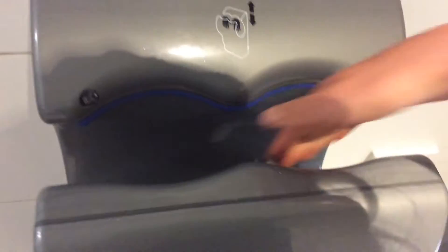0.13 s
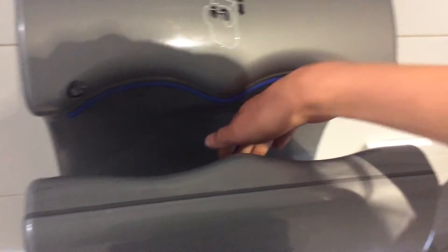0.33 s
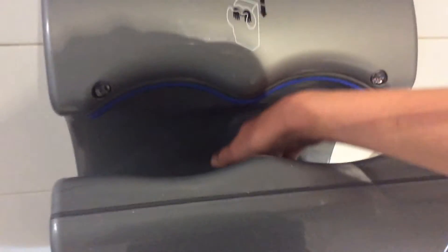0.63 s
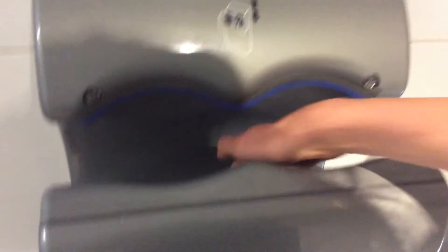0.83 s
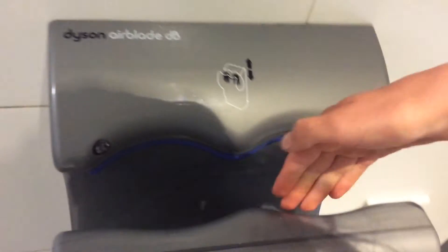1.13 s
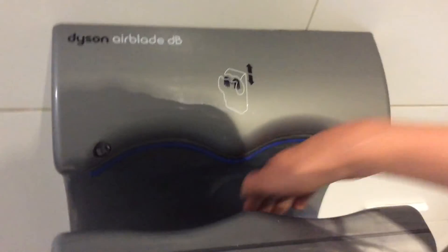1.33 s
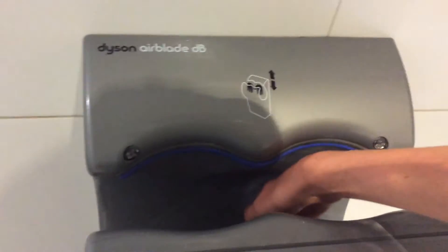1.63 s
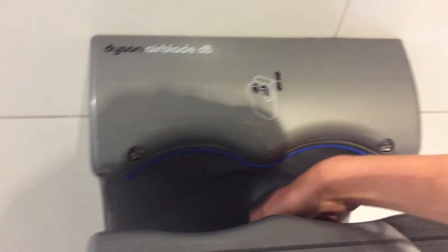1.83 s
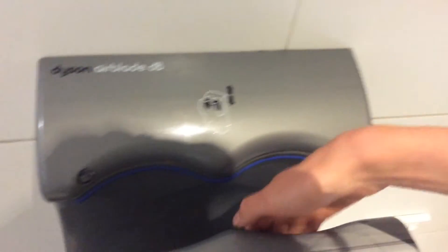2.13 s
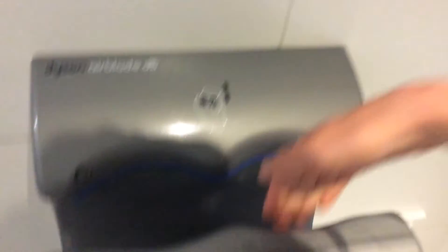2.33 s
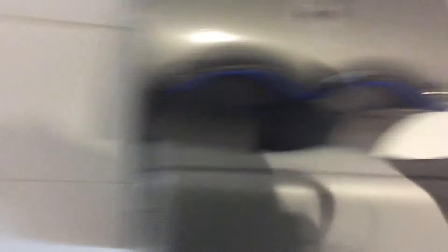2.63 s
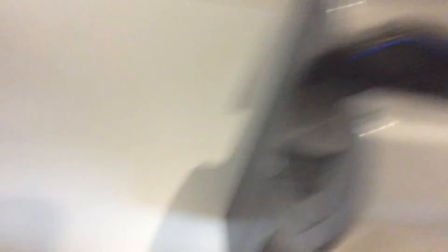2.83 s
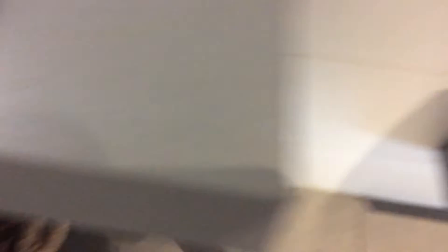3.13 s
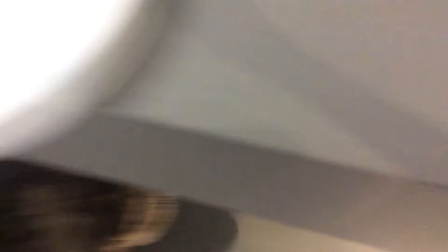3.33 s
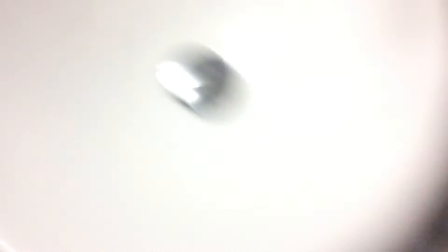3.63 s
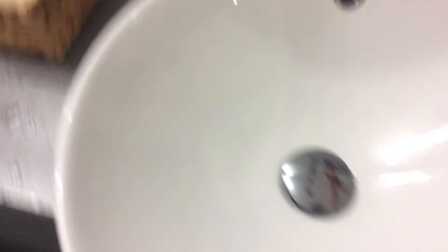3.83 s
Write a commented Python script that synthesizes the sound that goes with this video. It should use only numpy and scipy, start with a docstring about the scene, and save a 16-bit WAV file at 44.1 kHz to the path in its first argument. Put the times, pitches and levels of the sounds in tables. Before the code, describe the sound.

A hand dryer blows a loud, hissing rush with a high motor whine, whooshing as a hand dips in and out, close by in a tiled washroom. It winds down, then a faint knock and running tap follow.

```python
"""A wall hand dryer blows two thin sheets of air in a tiled washroom: their turbulence hisses, and breaks
on a hand that dips in and out. Hollow whooshes sound at the slot. The duct roars and the fast motor
whines at multiples of its shaft speed over a mains hum. Switched off, it coasts down under air drag:
its tones fall and the rush dies away. At the very end come a faint knock and the spray of a tap
starting to run in a basin."""
import sys
import numpy as np
from scipy import signal
from scipy.io import wavfile
from scipy.ndimage import uniform_filter1d

SR = 44100
rng = np.random.default_rng(int(sys.argv[2]) if len(sys.argv) > 2 else 0)


def dump(signal):
    """Clip the signal to [-1, 1] and save it as 16-bit WAV at the path in sys.argv[1]."""
    limited = np.clip(np.atleast_2d(signal).T, -1, 1)
    pcm = np.round(limited * 32767).astype(np.int16)
    wavfile.write(sys.argv[1], SR, pcm)


N = 176400
T = np.arange(N) / SR

SHAFT_HZ, MAINS_RIPPLE_HZ = 1545.4, 100
OFF_S, COAST_S = 3.165, 0.2  # the speed has halved COAST_S after switch-off
PATCHY_DB = 1.5  # depth of the drifting patches in the air noise

# Noise spectra, each with the columns: frequency_hz, relative_density_db
ROOM_SPECTRUM = [(30, -26), (150, -7), (240, -13), (345, -10.5), (600, -40), (700, 10), (1150, 16),
                 (1400, -34), (2560, -50), (3700, 14), (5000, 4), (7000, 4.5), (8370, -61), (10300, -58),
                 (10900, -60)]  # quiet air of the room
SPRAY_SPECTRUM = [(700, -39), (1020, -43), (1140, -24), (1300, -31), (2200, -28), (2450, -23), (3070, -21),
                  (3580, -18), (4000, -27), (4900, -15), (7000, -17), (8200, -9.5), (9800, -19),
                  (11000, -38), (14000, -53)]  # droplets on the basin
RUMBLE_SPECTRUM = [(15, -24), (30, -17), (60, -1.5), (85, 0), (130, -34)]  # deepest gusts of the airflow
LOW_ROAR_SPECTRUM = [(60, -35), (90, -1), (130, 1), (155, -3), (200, 1.5), (240, -4), (320, -20)]  # bass of the airflow
DUCT_SPECTRUM = [(170, -40), (250, -12.5), (295, -2), (365, -9), (410, -3.5), (465, -5.5), (512, -2.5),
                 (560, -10), (600, -10.5), (710, -11), (900, -13), (1200, -13), (1500, -24), (2000, -15)]  # air in the duct
HAND_SPECTRUM = [(650, -46), (1100, -9), (1480, -4.5), (1600, -3), (1870, -5), (2180, -3), (2470, -5),
                 (3250, -2.5), (3640, -4), (5000, -8), (6500, -4), (11000, -120)]  # air breaking on the hand
SHEET_SPECTRUM = [(2100, -64), (3500, -19), (4900, -13.5), (5600, -8.5), (6250, -2.5), (6700, -3.5),
                  (7300, -7), (7980, -3.5), (8080, 0.5), (8450, 0.5), (8800, -3), (9500, -5.5),
                  (10500, -15.5), (11500, -22), (12500, -47), (13300, -29), (13700, -39), (13900, -45),
                  (14150, -44)]  # the two air sheets

# Harmonics of the supply hum: ripple_multiple, base_level_db
HUM_HARMONICS = [(1, -34.5), (2, -45)]
# Tones of the driven motor: shaft_multiple, base_level_db, ripple_depth_rad
SHAFT_ORDERS = [(1, -48, 0.37), (2, -55.5, .3), (4, -42, 0.41), (9, -57, 1.2)]
# How strongly the casing radiates a coasting tone: pitch_hz, level_db
CASING_RESPONSE = [(300, -44), (345, -41), (400, -47), (450, -60), (510, -39), (550, -43), (600, -36),
                   (650, -49), (820, -53), (910, -37.5), (980, -46), (1100, -36.5), (1200, -43),
                   (1400, -58), (1750, -58), (1950, -41), (2200, -54), (2450, -41.5), (2650, -52),
                   (2850, -39.5), (3250, -38.5), (3600, -44), (4500, -64), (6200, -66)]
# Course of the roar at full fan speed: time_s, duct_level_db, low_roar_level_db
ROAR_LEVELS = [(0.0, -35, -48), (0.03, -36.5, -35), (0.2, -34, -40), (0.26, -32.5, -36), (0.99, -32.5, -37),
               (1.1, -38, -38.5), (1.82, -31.5, -37.5), (1.9, -35, -47), (1.95, -31, -37.5),
               (2.0, -33, -43), (2.05, -29.5, -34), (2.09, -30.5, -59), (2.17, -34.5, -36.5),
               (2.55, -37, -42), (2.66, -34.5, -33.5), (2.96, -34.5, -39.5), (2.98, -36, -33),
               (3.2, -32.5, -42)]
# Hollow whooshes at the slot; the last is a bright, sinking rush of air after the hand has left:
# start_s, length_s, first_pitch_hz, last_pitch_hz, level_db
SLOT_WHOOSHES = [(0.232, 0.22, 2330, 2070, -31), (0.274, 0.39, 1640, 1560, -37),
                 (0.688, 0.23, 1510, 1360, -36), (0.932, 0.13, 1480, 1670, -33),
                 (0.988, 0.076, 2230, 2130, -33), (1.37, 0.44, 1590, 1570, -40),
                 (1.72, 0.42, 1400, 1410, -36.5), (2.015, 0.41, 1720, 2180, -39),
                 (2.294, 0.057, 493, 486, -34), (2.806, 0.55, 3970, 3620, -42)]
# Course of the hiss at full fan speed: time_s, sheet_level_db, hand_level_db, treble_gain_db
JET_LEVELS = [(0.0, -16, -29.5, 2.5), (0.04, -15.5, -34, -0.5), (0.13, -20.5, -34.5, 2),
              (0.22, -17.5, -35.5, -0.5), (0.27, -14.5, -28, -2), (0.32, -17.5, -27, 0.5),
              (0.4, -15.5, -26, -2), (0.49, -15, -26, 2.5), (0.55, -15.5, -28.5, -0.5),
              (0.62, -16, -27, 0.5), (0.69, -18, -31, 2), (0.76, -20.5, -31, 3), (0.82, -15, -28.5, -1.5),
              (0.92, -14.5, -31.5, 3), (0.98, -13.5, -25.5, -2.5), (1.03, -14, -27, 2.5),
              (1.065, -11.5, -26, 1.5), (1.15, -13.5, -34.5, -2), (1.19, -18.5, -34, -0.5),
              (1.33, -18.5, -36, -0.5), (1.37, -15, -28, -1), (1.44, -18.5, -28, 1),
              (1.5, -15, -26.5, -0.5), (1.58, -15, -29.5, 1.5), (1.62, -16, -30, -1), (1.7, -17.5, -31, 1),
              (1.8, -17.5, -31, -0.5), (1.84, -17.5, -32, 0.5), (1.93, -18, -29, 1.5),
              (1.97, -16, -28.5, -1), (2.1, -15.5, -26, -0.5), (2.17, -13, -26, -1), (2.23, -11.5, -30, 0),
              (2.3, -12, -29.5, -2.5), (2.38, -13.5, -30.5, 0), (2.42, -19.5, -34.5, 2.5),
              (2.46, -18.5, -34.5, 0), (2.73, -18.5, -35, 1.5), (2.86, -21, -35, 4), (3.15, -22, -35.5, 1),
              (3.24, -24, -34.5, 7), (3.4, -21.5, -34, 0.5), (3.55, -19.5, -32, -1),
              (3.7, -21.5, -33.5, -3)]


def amp(db):
    """Amplitude ratio of a level in decibels."""
    return 10 ** (np.asarray(db) / 20)


def unit_rms(x):
    """Normalisation to unit mean power."""
    return x / np.sqrt(np.mean(x ** 2) + 1e-20)


def level_at(spectrum, hz):
    """Interpolation of a spectrum over log frequency; -90 dB beyond its ends."""
    points_hz, points_db = np.transpose(spectrum)
    return np.interp(np.log(hz + 1), np.log(points_hz + 1), points_db, left=-90, right=-90)


def envelopes(table):
    """Linear interpolation over time, one curve for each level column."""
    times_s, *columns = np.transpose(table)
    return [np.interp(T, times_s, column) for column in columns]


def drift(top_hz):
    """Superposed sines of random phase: a fluctuation in the three octaves below top_hz, rms 1."""
    return unit_rms(sum(np.sin(2 * np.pi * (hz * T + rng.random())) / np.sqrt(hz)
                        for hz in np.geomspace(top_hz / 8, top_hz, num=16)))


def shaped_noise(spectrum, patchy_db, size=1024):
    """Spectral shaping of Gaussian noise, with patches drifting in time and frequency; rms 1."""
    hz = np.fft.rfftfreq(size, 1 / SR)
    real, imag, patches = rng.standard_normal((N * 4 // size + 5, len(hz), 3)).T
    patches = unit_rms(uniform_filter1d(uniform_filter1d(patches, size=10, axis=0), size=10, axis=1))
    frames = (real + 1j * imag) * amp(level_at(spectrum, hz)[:, None] + patchy_db * patches)
    return unit_rms(signal.istft(frames, nperseg=size, noverlap=size * 3 // 4)[1][:N])


def lowpass(x, cutoff_hz, taps):
    """Linear-phase filtering without delay, so that bands can be split by subtraction."""
    return signal.oaconvolve(x, signal.firwin(taps, cutoff_hz, fs=SR), "same")


def resonate(x, hz, width_hz):
    """A damped resonator whose natural frequency follows the curve hz."""
    carrier = np.exp(2j * np.pi * np.cumsum(hz) / SR)
    pole = np.exp(-np.pi * width_hz / SR)
    return 2 * (carrier * signal.lfilter([1 - pole], [1, -pole], x / carrier)).real


def speed_halvings():
    """Quadratic air drag brakes the motor after switch-off; counts how often its speed has halved."""
    return np.log2(1 + np.maximum(T - OFF_S, 0) / COAST_S)


def room_air():
    """Ambient noise: the quiet air of the room sets a steady floor."""
    return amp(-55.5) * shaped_noise(ROOM_SPECTRUM, patchy_db=0.5)


def knock(start_s=3.9122, level_db=-35, pitch_hz=330, t60_s=0.03):
    """One heavily damped mode decays exponentially: a soft, dull knock."""
    age = np.maximum(T - start_s, 0)
    attack = np.minimum(age / 0.0013, 1)
    return -attack * amp(level_db - 60 * age / t60_s) * np.sin(2 * np.pi * pitch_hz * age)


def tap_water(start_s=3.937, rise_s=0.033, pipe_hz=1170, fall_hz_per_s=1170):
    """Fine droplet impacts on the basin merge into noise; the pipe adds a faint, sinking whistle."""
    age = T - start_s
    opening = np.sqrt(np.clip(age / rise_s, 0, 1))
    whistle = amp(-49) * np.sin(2 * np.pi * (pipe_hz * T - fall_hz_per_s * age ** 2 / 2))
    spray = amp(-32.5 + 0.6 * drift(300)) * shaped_noise(SPRAY_SPECTRUM, patchy_db=1, size=512)
    return opening * (spray + whistle)


def mains_hum(lift_db, stop_s=3.22, fade_s=0.029, ring_s=0.22, ring_share=0.16):
    """Harmonics of the supply ripple stop quickly, while a share rings on as room reverberation."""
    age = np.maximum(T - stop_s, 0)
    envelope = (1 - ring_share) * np.exp(-age / fade_s) + ring_share * np.exp(-age / ring_s)
    hum = np.zeros(N)
    for multiple, base_db in HUM_HARMONICS:
        level_db = base_db + lift_db * (multiple > 1) + 0.5 * drift(12)
        hum += amp(level_db) * np.sin(2 * np.pi * multiple * MAINS_RIPPLE_HZ * T)
    return envelope * hum


def shaft_whine(lift_db, jitter_rad=0.06, waver_db=1.8):
    """Wavering harmonics of the shaft rotation, phase-modulated by the mains ripple."""
    whine = np.zeros(N)
    for order, base_db, ripple_rad in SHAFT_ORDERS:
        wobble = ripple_rad * np.sin(2 * np.pi * MAINS_RIPPLE_HZ * T) + order * jitter_rad * drift(30)
        level_db = base_db + lift_db + waver_db * drift(13)
        whine += amp(level_db) * np.sin(2 * np.pi * order * SHAFT_HZ * T + wobble)
    return whine


def coasting_tones(jitter_rad=0.42, db_per_halving=8):
    """Forced vibration: two falling shaft orders swell as they sweep through the casing's resonances."""
    halvings = speed_halvings()
    speed_hz = SHAFT_HZ / 2 ** halvings
    turns = np.cumsum(speed_hz) / SR
    tones = np.zeros(N)
    for order in (1, 4):
        level_db = level_at(CASING_RESPONSE, order * speed_hz) - db_per_halving * halvings
        tones += amp(level_db) * np.sin(2 * np.pi * order * turns + jitter_rad * drift(90))
    return tones


def tile_reverb(x, t60_s=0.7, gain_db=-1):
    """Dense reflections from the tiles form an exponentially decaying tail."""
    tail = rng.standard_normal(SR // 2) * amp(-60 * T[:SR // 2] / t60_s)
    return amp(gain_db) * signal.fftconvolve(x, tail / np.linalg.norm(tail))[:N]


def motor(linger_s=0.05):
    """Tonal machine noise: after switch-off the whine lingers in the room and yields to coasting tones."""
    driven = np.clip((OFF_S - T) / linger_s + 1, 0, 1)
    lift_db = 4.5 * np.clip((T - 2.6) / 0.27, 0, 1)  # the tones come forward once the hand has left
    running = driven * shaft_whine(lift_db) + mains_hum(lift_db)
    coasting = (1 - driven) * coasting_tones()
    return np.sqrt(2) * (running + coasting + tile_reverb(coasting))  # sine levels from rms to peak


def duct_roar():
    """Turbulent duct flow roars over a gusting bass; each band drops a set level per halving of speed."""
    duct_db, low_db = envelopes(ROAR_LEVELS)
    halvings = speed_halvings()
    duct = amp(duct_db - 10.5 * halvings) * shaped_noise(DUCT_SPECTRUM, PATCHY_DB, size=2048)
    low_roar = amp(low_db - 8 * halvings) * shaped_noise(LOW_ROAR_SPECTRUM, PATCHY_DB, size=4096)
    gust_db = -43.5 + 2 * drift(9)
    rumble = amp(gust_db - 15 * halvings) * shaped_noise(RUMBLE_SPECTRUM, patchy_db=0, size=4096)
    return duct + low_roar + rumble


def slot_whooshes(width_hz=410):
    """Resonant filtering of noise: hollow whooshes at the slot swell and fade at a gliding pitch."""
    whooshes = np.zeros(N)
    for start_s, length_s, first_hz, last_hz, level_db in SLOT_WHOOSHES:
        progress = np.clip((T - start_s) / length_s, 0, 1)
        pitch_hz = first_hz + (last_hz - first_hz) * progress
        ring = resonate(resonate(rng.standard_normal(N), pitch_hz, width_hz), pitch_hz, width_hz)
        swell = np.sqrt(abs(np.sin(np.pi * progress)))
        whooshes += amp(level_db) * swell * unit_rms(ring)
    return whooshes


def air_sheets(fade_db_per_s=17):
    """Turbulent jet noise: the sheets hiss and break on the hand, weakening as the fan slows."""
    sheet_db, hand_db, treble_db = envelopes(JET_LEVELS)
    halvings = speed_halvings()
    # Both layers flicker together, and fade further as the air column comes to rest.
    flow_db = 0.5 * drift(40) - fade_db_per_s * np.maximum(T - OFF_S, 0)
    hiss = shaped_noise(SHEET_SPECTRUM, PATCHY_DB)
    body = lowpass(hiss, cutoff_hz=7400, taps=101)
    highest = hiss - lowpass(hiss, cutoff_hz=10600, taps=201)
    upper = hiss - body - highest
    treble = upper + amp(-26 * halvings) * highest  # the highest hiss dies fastest
    sheets = amp(sheet_db - 6.5 * halvings + flow_db) * (body + amp(treble_db) * treble)
    on_hand = amp(hand_db - 5.5 * halvings + flow_db) * shaped_noise(HAND_SPECTRUM, PATCHY_DB)
    return sheets + on_hand


def scene():
    """Superposition: all sources add at one point, the same in both channels."""
    dryer = air_sheets() + duct_roar() + slot_whooshes() + motor()
    mono = dryer + knock() + tap_water() + room_air()
    return np.array([mono, mono])


def record(dry, knee=0.7, headroom=0.2, cutoff_hz=14300):
    """Soft saturation rounds off peaks above the knee; a low-pass filter then limits the band."""
    excess = np.maximum(abs(dry) - knee, 0)
    rounded = dry - np.sign(dry) * (excess - headroom * np.tanh(excess / headroom))
    band_limit = signal.firwin(511, cutoff_hz, window=("kaiser", 9), fs=SR)
    return signal.oaconvolve(rounded, band_limit[None], "same")


dry = scene()
out = record(dry)
dump(out)
```